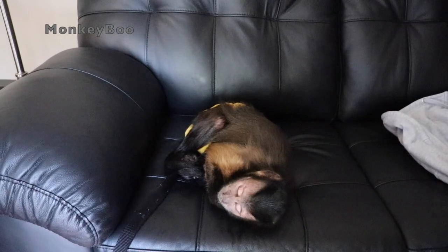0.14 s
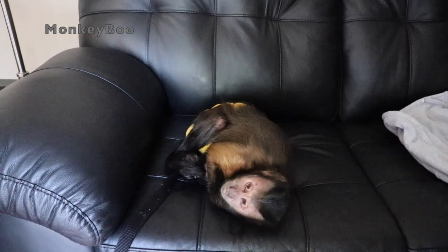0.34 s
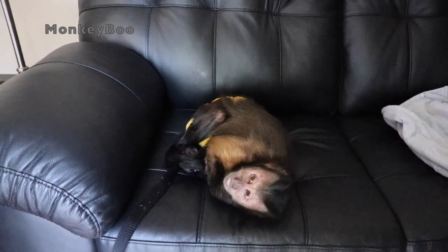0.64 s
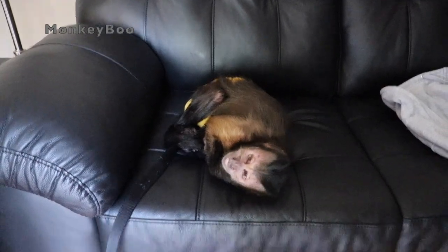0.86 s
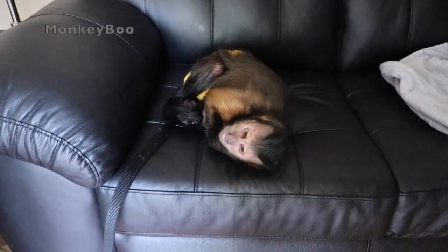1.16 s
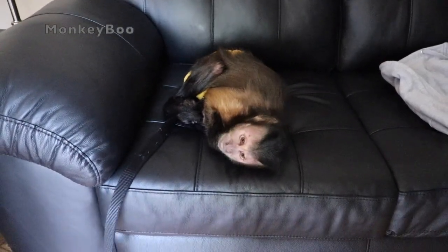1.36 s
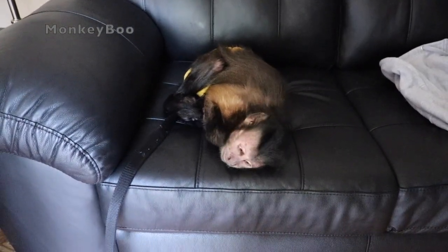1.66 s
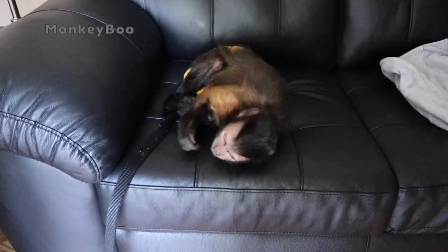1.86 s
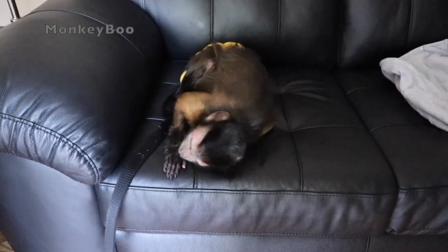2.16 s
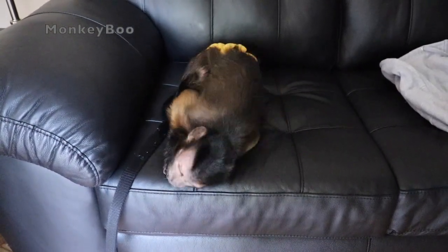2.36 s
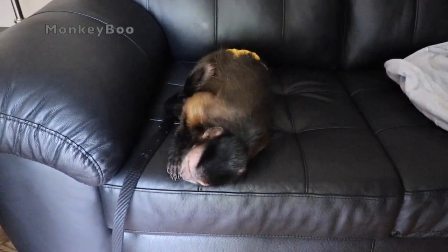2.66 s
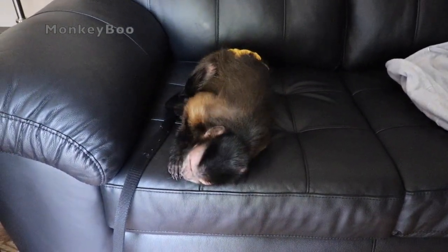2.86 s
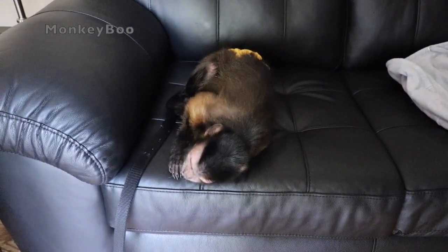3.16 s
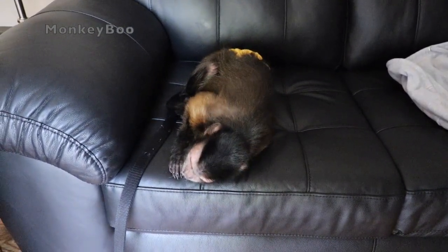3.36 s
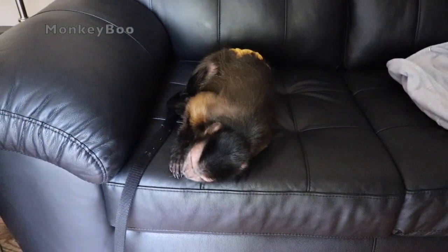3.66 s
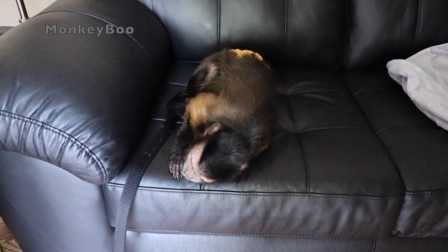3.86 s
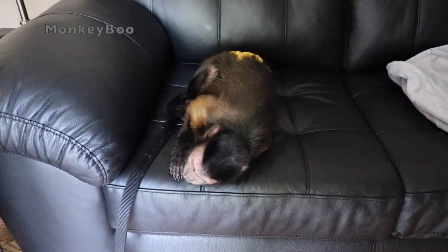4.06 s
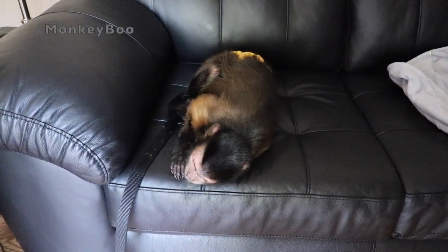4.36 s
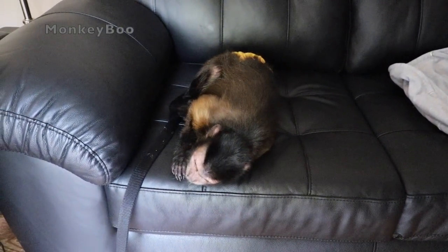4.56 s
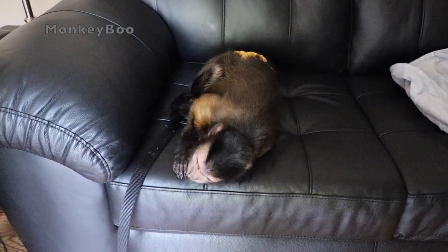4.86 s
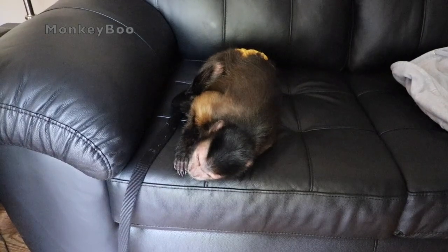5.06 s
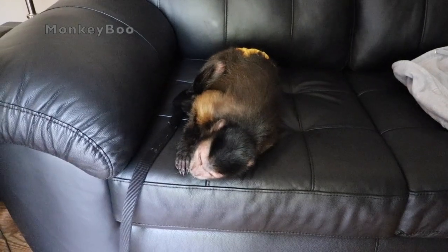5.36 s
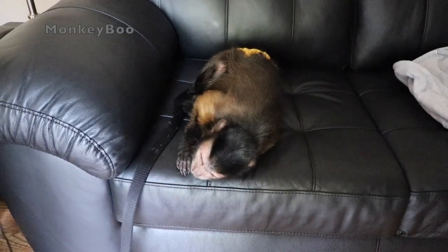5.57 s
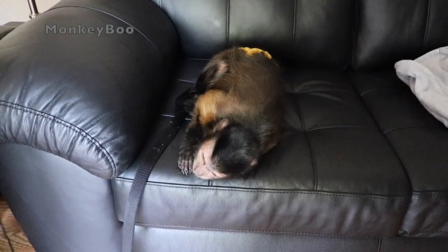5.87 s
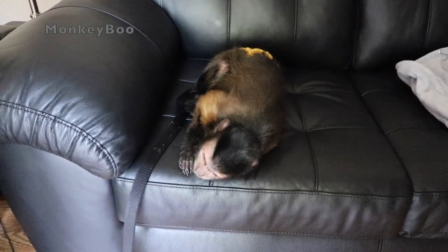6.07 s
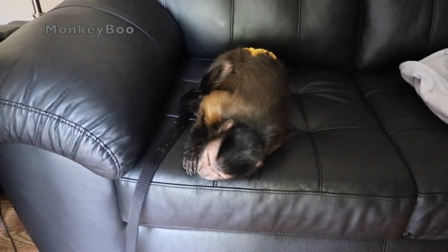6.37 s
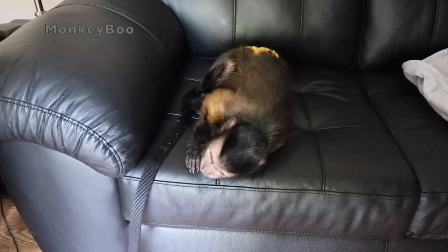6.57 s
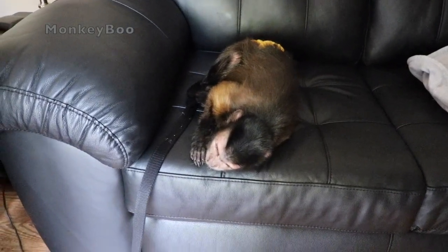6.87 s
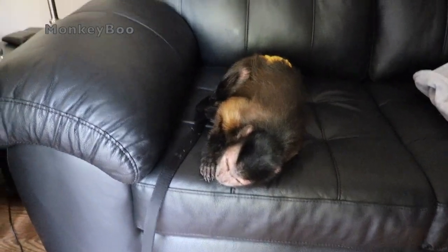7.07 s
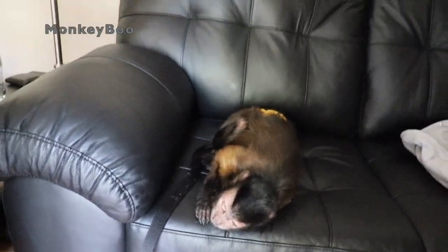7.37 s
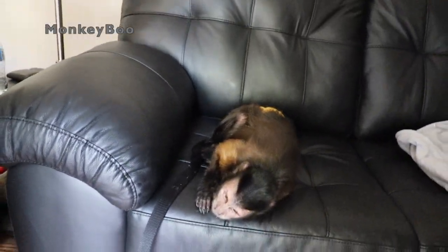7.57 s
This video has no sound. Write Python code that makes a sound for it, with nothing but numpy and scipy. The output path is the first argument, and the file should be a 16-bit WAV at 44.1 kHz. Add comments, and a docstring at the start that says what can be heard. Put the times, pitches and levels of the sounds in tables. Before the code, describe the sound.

In a quiet living room with soft rumble and appliance hum, a monkey squeaks nine times close to the microphone, slightly to the right. The calls are brief and high, mostly wavering upward and dropping at the end; one is lower and raspy. Faint rising peeps come midway and again at the end. Tiny smacks and the soft rustle of fur on leather sit between the calls, and a faint motor speeds up late on.

```python
"""A quiet living room, microphone pair close to a capuchin monkey on a leather sofa, a little to the right.
Over low hum and rumble its vocal folds give five wavering squeaks, among small smacks and rustles of fur;
the fourth is low and hoarse, the face turned away. Thin peeps climb at 3.1 s, then four more squeaks
follow, the last three rounder as the mouth closes. A faint motor speeds up near 5.7 s, and at 7.5 s
two more peeps and a rustle end the scene."""
import sys
import numpy as np
from scipy import signal
from scipy.fft import rfft, irfft, next_fast_len
from scipy.io import wavfile
from scipy.ndimage import uniform_filter1d, map_coordinates

SR = 44100
rng = np.random.default_rng(int(sys.argv[2]) if len(sys.argv) > 2 else 0)


def waveform_to_disk(signal):
    """Save audio, clipped to [-1, 1], as 16-bit WAV at the path in sys.argv[1]."""
    frames = np.transpose(np.atleast_2d(signal))
    scaled = np.clip(frames, -1, 1) * 32767
    samples = np.round(scaled).astype(np.int16)
    wavfile.write(sys.argv[1], SR, samples)


N = 340452

# the tune of each call: (time [s], pitch [Hz])
TUNE_1 = [(0.0, 1255), (0.029, 1385), (0.041, 1230), (0.066, 1353), (0.107, 1410), (0.172, 1188)]
TUNE_2 = [(0.643, 1281), (0.71, 1193), (0.772, 1394), (0.802, 1314), (0.862, 1507), (0.897, 1428),
          (0.934, 1487), (1.057, 1352), (1.126, 1158)]
TUNE_3 = [(1.47, 1548), (1.49, 1560), (1.498, 1406), (1.546, 1263), (1.598, 1463), (1.644, 1247),
          (1.664, 1228), (1.706, 1285), (1.767, 1131)]
TUNE_4 = [(2.162, 1367), (2.241, 1045), (2.306, 982), (2.308, 959), (2.433, 867), (2.449, 820)]
TUNE_5 = [(2.621, 1616), (2.65, 1326), (2.681, 1357), (2.727, 1569), (2.77, 1488), (2.81, 1693),
          (2.834, 1652), (2.874, 1470), (2.938, 1339)]
TUNE_6 = [(3.478, 1264), (3.552, 1202), (3.611, 1407), (3.656, 1335), (3.696, 1480), (3.726, 1518),
          (3.782, 1319), (3.837, 1286)]
TUNE_7 = [(4.626, 1124), (4.706, 1048), (4.755, 1165), (4.867, 1110), (4.885, 1074), (4.925, 998)]
TUNE_8 = [(5.683, 1159), (5.769, 1128), (5.811, 1367), (5.868, 1264), (5.874, 1317), (5.927, 1307),
          (5.978, 1465), (6.022, 1449), (6.115, 1291)]
TUNE_9 = [(6.864, 1220), (6.946, 1173), (6.979, 1446), (7.096, 1609), (7.111, 1546), (7.16, 1606),
          (7.199, 1533), (7.25, 1569), (7.326, 1390)]
# one row per call: (tune, opening quaver [share of pitch], closing drop [share of pitch], release [s],
#   hoarseness [1 = usual], accent [dB], overtones (level [dB], swell [dB/octave of pitch]),
#   fundamental (level [dB], swell [dB/octave of pitch]), treble tilt (start [dB/octave], end [dB/octave]),
#   mouth opening (start [0-1], end [0-1]), lips (peak [Hz], gain [dB], hollow [Hz], gain [dB]))
SQUEAKS = [(TUNE_1, 0, 0, 0.03, 1.1, 1, (-26, 13), (-24, -31), (2.2, 3.2), (0.87, 0.8),
           (4532, 6.5, 2662, -9.5)), (TUNE_2, 0.019, 0.24, 0.0043, 1.07, 0, (-23, 25), (-23.5, -15),
           (0, 5.5), (0.79, 0.83), (9200, 5.5, 8200, -1)), (TUNE_3, 0, 0.208, 0.0047, 1.27, 0, (-23.5, 4.8),
           (-21.5, 0), (2.1, .5), (0.99, 0.94), (7899.5, 5.5, 6499.5, -4.5)),
           (TUNE_4, 0, 0.066, 0.0019, 2.57, 1.7, (-36.5, 27.7), (-30.5, 20.3), (0, -4), (0.84, .034),
           (4220, 5, 3400, -6.5)), (TUNE_5, 0, 0.29, .005, .9, 0.97, (-22.5, 0.5), (-20, 13.4), (0.57, 1.2),
           (0.86, 0.81), (7002, 9, 9000, -6)), (TUNE_6, 0.03, 0.41, 0.0092, 0.82, 0, (-24, 27),
           (-24.5, -17), (-.8, -3.3), (0.86, 0.64), (7303, 8, 8500, -11.5)),
           (TUNE_7, .04, 0.27, 0.0013, 1.3, 1, (-29.5, 29), (-30.5, -3), (-1.4, -2), (.27, 0.26),
           (5800, 6, 5200, -4.5)), (TUNE_8, 0.017, .03, 0.0052, 0.8, 0.95, (-28, 3.6), (-29.5, -20),
           (1.8, 0.68), (0.022, 0.45), (9713, 0, 9000, -4)),
           (TUNE_9, 0.014, 0, 0.015, 0.76, 0.49, (-25.5, 3), (-23, -4.5), (-0.74, 1.3), (0.33, 0.33),
           (4235, 5, 2318, -7.5))]
# colour of the throat, mouth wide and nearly shut: (frequency [Hz], gain [dB])
MOUTH_OPEN = [(800.0, 2.5), (1400.0, -5), (2200.0, 2.7), (2800.0, -12), (3400.0, -0.5), (4200.0, 6),
              (4900.0, 0.5), (5600.0, 6.5), (6600.0, -17), (8000.0, -26.5), (9300.0, -31), (11000.0, -38),
              (13000.0, -35), (15500.0, -39)]
MOUTH_SHUT = [(800, -4.5), (1400, -1), (2200, -9), (2800, 1.5), (3400, 3.5), (4200, -14), (4900, -13),
              (5600, -38.5), (6600, -31.5), (8000, -31), (9300, -42), (11000, -25.5), (13000, -69.5),
              (15500, -43)]
# slow flare and, at usual hoarseness, fast flutter of each partial: (frequency [Hz], depth [dB])
FLARE = [(1300, 1.85), (2800, .5), (6000, 1.5), (11000, 1)]
FLUTTER = [(1400, 1.3), (4000, 1.14), (9000, 2.6)]
# the face turning away from the microphones: (time [s], turn [share, capped at 1])
FACE_TURN = [(0, 0), (2.17, 0.8), (2.26, 0), (2.48, 6), (2.62, 0.7), (3.5, 1.14), (4.6, 0.4), (5.8, 0.67),
             (7.3, 3.3)]
# shadow of the head when fully turned: (frequency [Hz], gain [dB])
HEAD_SHADOW = [(1000, -2.5), (2800, 1.5), (4000, -8), (5500, -18.5), (8000, -12), (11000, -0.5)]
# direct sound across the microphone pair: (frequency [Hz], left minus right [dB])
MIC_BALANCE = [(1200, -0.5), (1600, 1), (2400, -3.5), (3200, -8.5), (4300, -3.5), (5600, -3.5), (8000, 2),
               (12000, -0.5)]
# two runs of peeps climbing in steps: (start [s], end [s], pitch [Hz], relative level [dB])
PEEPS = [(3.095, 3.155, 2510, -47), (3.146, 3.239, 2850, -43.5), (3.242, 3.35, 3034, -44.5),
         (3.317, 3.432, 3240, -45.5), (3.431, 3.493, 3575, -45), (7.516, 7.648, 2350, -50.5),
         (7.644, 7.712, 2827, -44)]
# smacks of lips and leather: (time [s], peak level [dB], centre [Hz])
SMACKS = [(0.447, -36, 7900), (0.573, -37.5, 3600), (1.438, -34, 6970), (3.189, -43, 7840),
          (3.426, -43, 8000), (5.617, -40.5, 2948), (6.798, -41, 2962), (7.38, -40, 5000),
          (7.489, -54, 6100), (7.602, -33, 5400)]
# the monkey shifts on the sofa: (middle [s], half length [s], level [dB])
SHIFTS = [(.6, 2.35, -61.5), (2.327, 0.21, -50.5), (3.8, 0.73, -63.5), (6.46, 0.046, -59),
          (7.55, 0.58, -57.5)]
# colour of fur on leather: (frequency [Hz], gain [dB])
RUSTLE_COLOUR = [(60, -20.5), (300, 6), (1500, 7), (5000, 0), (10000, -6.0), (15800, -10)]
# decay of the walls' tail: (frequency [Hz], time to fall 60 dB [s])
ROOM_T60 = [(500, 0.4), (1400, 0.38), (4500, 0.4039), (8000, 0.21), (15000, 0.51)]
# colour of that tail: (frequency [Hz], gain [dB])
ROOM_COLOUR = [(800, -11), (1400, -5.5), (2800, -10), (4500, -10.5), (8000, -3), (15000, -10.5)]
# lines of an appliance's hum: (frequency [Hz], relative level [dB])
HUM = [(121, -76.5), (182, -75), (241, -64), (291, -64), (360, -66)]
# colour of the room tone: (frequency [Hz], relative density [dB])
AIR_COLOUR = [(20, -8), (40, -2), (63, -6), (90, 1.46), (115, 3), (160, -2), (500, -5), (950, -10),
              (1200, -9), (1700, -14), (2500, -15), (5000, -18.5), (10000, -24), (15800, -29)]
# how alike the room tone is at the two microphones: (frequency [Hz], correlation [0-1])
AIR_LIKENESS = [(60, 0.91), (130, 0.94), (300, 0.48), (600, 0.77), (1650, 0.17), (5000, 0.1)]


def squeak(tune, quaver, drop, release, hoarse, accent_db, overtones, fundamental, tilt, opening, lips,
           quaver_hz=20, quaver_s=0.13, drop_s=0.008, drop_db_per_octave=25, accent_s=0.039,
           waver=0.0032, jitter=0.0031, rasp_db=-39, onset_rasp_db=22.5):
    """The vocal folds give a stack of harmonics, shaped by the opening of the mouth and by the lips."""
    t, gate = voiced(tune[0][0], tune[-1][0], attack=0.0021, release=release)
    age = t - t[0]
    overtone_db, overtone_swell_db = overtones
    fundamental_db, fundamental_swell_db = fundamental
    peak_hz, peak_db, hollow_hz, hollow_db = lips
    # the pitch quavers at the start and collapses as the push runs out
    held = curve(tune, t, smooth_s=0.023)
    shake = quaver * np.cos(2 * np.pi * quaver_hz * age) * np.exp(-(age / quaver_s) ** 2)
    collapse = 1 - drop * np.exp((t - t[-1]) / drop_s)
    unsteady = 1 + waver * wobble(t, 91.24) + hoarse * jitter * wobble(t, 700)
    pitch = held * (1 + shake) * collapse * unsteady
    phase = 2 * np.pi * np.cumsum(pitch) / SR
    # loudness follows pitch, with a push at the start and a fade in the drop
    octaves = np.log2(held / held.mean())
    push_db = accent_db * np.exp(-(age / accent_s) ** 2) + drop_db_per_octave * np.log2(collapse)
    level_db = overtone_db + overtone_swell_db * octaves + push_db
    chest_db = fundamental_db + fundamental_swell_db * octaves + push_db
    mouth = np.linspace(*opening, len(t))
    tilt_db = np.linspace(*tilt, len(t))
    voice = np.zeros(len(t))
    for k in range(1, 16):
        hz = k * pitch
        throat_db = mouth * along(MOUTH_OPEN, hz) + (1 - mouth) * along(MOUTH_SHUT, hz)
        lips_db = peak_db * bump(hz, peak_hz) + hollow_db * bump(hz, hollow_hz)
        source_db = chest_db if k == 1 else level_db + tilt_db * np.log2(np.clip(hz / 3000, 1, 4))
        flutter_db = hoarse * along(FLUTTER, hz) * wobble(t, 110.1)
        flare_db = along(FLARE, hz) * wobble(t, 27.93)
        gain = amp(source_db + throat_db + lips_db + flutter_db + flare_db)
        voice += gain * (hz < SR / 2) * np.sin(k * phase)
    # air escapes once a cycle through the same throat, with a brief burst of rasp as each squeak starts
    puffs = rng.standard_normal(len(t)) * (1 + np.cos(phase))
    wide, shut = (unit(filtered(puffs, lambda hz: amp(along(shape, hz)) * (hz > 1150)))
                  for shape in (MOUTH_OPEN, MOUTH_SHUT))
    breath = mouth * wide + (1 - mouth) * shut / 2
    rasp = hoarse * amp(level_db + rasp_db + onset_rasp_db * np.exp(-age / 0.025)) * breath
    return gate * (np.sqrt(2) * voice + rasp)


def monkey():
    """Nine squeaky calls from the sofa, close to the microphones."""
    track = np.zeros(N)
    for tune, *manner in SQUEAKS:
        add(track, tune[0][0], squeak(tune, *manner))
    return track


def peeps(jitter=0.024, flutter_db=3.0, octave_db=-11, lift_db=2):
    """Thin, wheezy whistles with a weak octave; each holds one note."""
    track = np.zeros(N)
    for start, end, hz, db in PEEPS:
        t, gate = voiced(start, end, attack=0.021, release=0.0073)
        phase = 2 * np.pi * np.cumsum(hz * (1 + jitter * wobble(t, 920))) / SR
        tone = np.sin(phase) + amp(octave_db) * np.sin(2 * phase)
        add(track, start, gate * amp(db + lift_db + flutter_db * wobble(t, 63.6)) * tone)
    return track


def smacks(t60=0.012, attack_s=0.00043):
    """Lips and leather, close up: each smack is a short burst of noise in one broad resonance."""
    track, t = np.zeros(N), np.arange(SR // 16) / SR
    for s, db, hz in SMACKS:
        burst = rng.standard_normal(len(t)) * amp(-60 * t / t60) * (1 - np.exp(-t / attack_s))
        resonance = signal.iirpeak(hz, Q=1.7, fs=SR)
        tick = signal.lfilter(*resonance, signal.lfilter(*resonance, burst))
        add(track, s, amp(db) * tick / np.abs(tick).max())
    return track


def rustle(t, grain_db=3.5, clump_db=1.33):
    """Fur brushes over leather in fine, clumped grains; each shift swells and fades."""
    motion = sum(amp(db) * np.exp(-((t - s) / half_s) ** 2) for s, half_s, db in SHIFTS)
    grains = rng.standard_normal(N) * amp(grain_db * wobble(t, 600) + clump_db * wobble(t, 25))
    return motion * unit(coloured(grains, RUSTLE_COLOUR))


def room(x, near_db=-5.5, near_t60=0.053, build_s=0.017):
    """The sofa and floor answer at once; the walls follow with a soft tail."""
    hz, t, spectra = signal.stft(rng.standard_normal((2, SR // 2)), SR, nperseg=256)
    decay = amp(-60 * t / along(ROOM_T60, hz)[:, None])
    tail = signal.istft(spectra * decay, SR, nperseg=256)[1]
    t = np.arange(tail.shape[1]) / SR
    tail *= 1 - np.exp(-t / build_s)
    tail = coloured(tail / np.linalg.norm(tail[0]), ROOM_COLOUR)
    # near reflections reach both microphones partly alike
    near = rng.standard_normal(len(t)) + 0.92 * rng.standard_normal(tail.shape)
    near *= amp(-60 * t / near_t60) * (t > .001)
    answer = tail + amp(near_db) * near / np.linalg.norm(near[0])
    return signal.fftconvolve(x[None], answer, axes=1)[:, :N]


def motor(t, idle_hz=116, running_hz=187, idle_db=-62, running_db=-64,
          climb_at_s=5.68, climb_s=0.17, housing_hz=145.2, housing_db=12):
    """A faint, wandering drone idles, then swells as it speeds up through a resonance of its housing."""
    speed = (1 + np.tanh((t - climb_at_s) / climb_s)) / 2
    hz = idle_hz + (running_hz - idle_hz) * speed
    db = idle_db + (running_db - idle_db) * speed + housing_db * bump(hz, housing_hz)
    gain = np.sqrt(2) * amp(db + 3.4 * wobble(t, 9.3))
    wander = (1.8 - 0.6 * speed) * wobble(t, 4.5)
    return gain * np.sin(2 * np.pi * np.cumsum(hz) / SR + wander)


def hum(t, trim_db=-1):
    """An appliance hums alike in both microphones; each line drifts in level and phase."""
    track = np.zeros(N)
    for hz, db in HUM:
        gain = np.sqrt(2) * amp(db + trim_db + 2.36 * wobble(t, 2.846))
        track += gain * np.sin(2 * np.pi * hz * t + .8 * wobble(t, 6))
    return track


def room_tone(t, level_db=-51):
    """Soft air all round the microphones: the rumble sits in the middle, the hiss is wide."""
    def mid_and_side(hz):
        angle = np.arccos(along(AIR_LIKENESS, hz)) / 2
        return amp(along(AIR_COLOUR, hz)) * [np.cos(angle), np.sin(angle)]
    mid, side = filtered(rng.standard_normal((2, N)), mid_and_side)
    return unit(np.array([mid + side, mid - side])) * amp(level_db + 0.11 * wobble(t, 3.65))


def amp(db):
    """Decibels to gain."""
    return 10 ** (np.asarray(db) / 20)


def unit(x):
    """Scale to rms 1."""
    return x / np.sqrt(np.mean(x ** 2) + 1e-20)


def along(points, hz):
    """Read (frequency [Hz], value) points on a log axis."""
    f, v = np.transpose(points)
    return np.interp(np.log(hz + 1), np.log(f + 1), v)


def bump(hz, centre_hz, width=.13):
    """A bell on a log-frequency axis, 1 at its centre."""
    return np.exp(-(np.log((hz + 1) / centre_hz) / width) ** 2)


def curve(points, t, smooth_s=.008):
    """Read (time [s], value) points, with the corners rounded."""
    return uniform_filter1d(np.interp(t, *np.transpose(points)), int(smooth_s * SR))


def wobble(t, rate):
    """A smooth random curve, rate knots a second."""
    knots = (t - t[0]) * rate
    grid = np.arange(0, knots[-1] + 1, 1 / 10)
    return np.interp(knots, grid, map_coordinates(rng.standard_normal(int(knots[-1]) + 5), [grid + 1]))


def filtered(x, response):
    """Pass x through a response given as a function of frequency."""
    m = next_fast_len(x.shape[-1] + SR // 4)
    return irfft(rfft(x, m) * response(np.fft.rfftfreq(m, 1 / SR)), m)[..., :x.shape[-1]]


def coloured(x, colour):
    """Filter x by (frequency [Hz], gain [dB]) points."""
    return filtered(x, lambda hz: amp(along(colour, hz)))


def add(track, s, sound):
    """Mix a sound into a track from time s."""
    part = track[int(s * SR):][:len(sound)]
    part += sound[:len(part)]


def voiced(start, end, attack, release):
    """Sample times of one call and the gate that starts and stops it."""
    t = np.arange(start, end, 1 / SR)
    ramp = np.minimum((t - start) / attack, (t[-1] - t) / release)
    return t, np.sin(np.pi / 2 * np.clip(ramp, 0, 1)) ** 2


def scene(left_lead_s=.000014, peep_direct_db=-4, peep_room_db=6):
    """The monkey is close, a little to the right; its head shades the direct calls, not their echo."""
    t = np.arange(N) / SR
    voice, whistles, movement = monkey(), peeps(), smacks() + rustle(t)
    turned = np.clip(curve(FACE_TURN, t), 0, 1)
    shaded = (1 - turned) * voice + turned * coloured(voice, HEAD_SHADOW)
    close = shaded + movement + amp(peep_direct_db) * whistles
    # the two microphones hear it at slightly unequal levels and times
    sides = np.array([[1], [-1]]) / 2
    direct = filtered(close, lambda hz: amp(sides * along(MIC_BALANCE, hz))
                      * np.exp(2j * np.pi * hz * sides * left_lead_s))
    # the peeps arrive mostly by way of the room
    reflected = room(voice + movement + amp(peep_room_db) * whistles)
    return direct + reflected + room_tone(t) + hum(t) + motor(t)


def record(dry, top_hz=15830):
    """The recorder keeps nothing above its band limit."""
    return filtered(dry, lambda hz: hz < top_hz)


dry = scene()
out = record(dry)
waveform_to_disk(out)
```